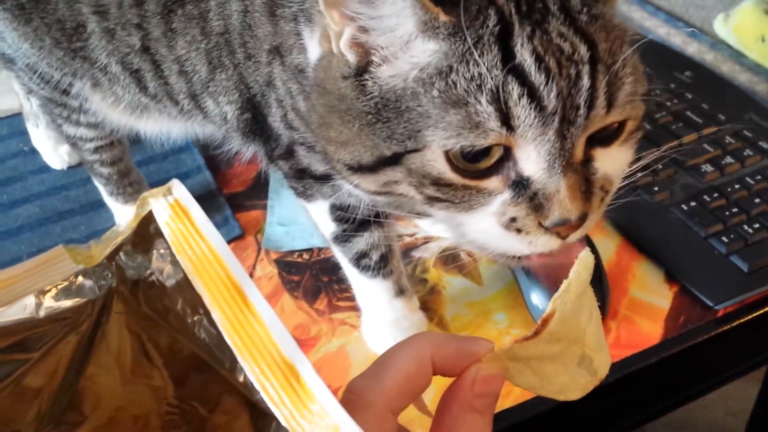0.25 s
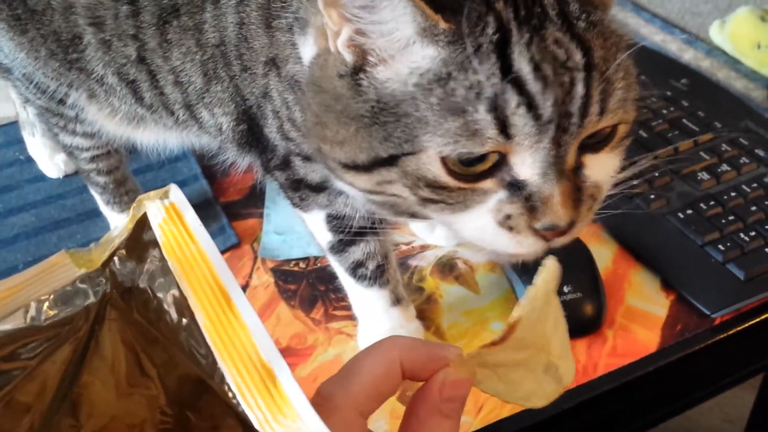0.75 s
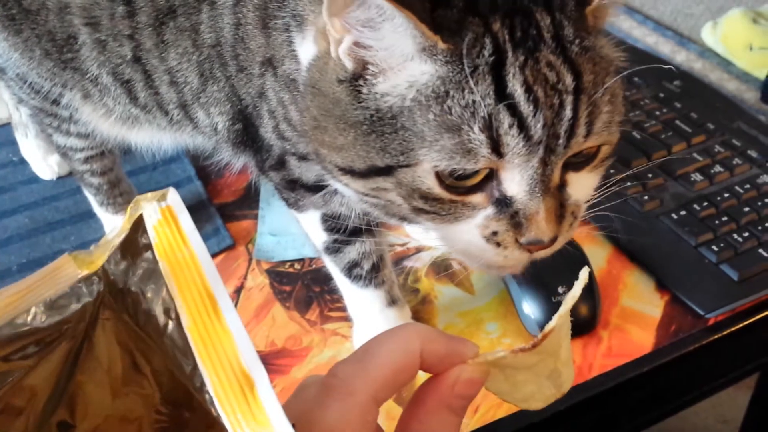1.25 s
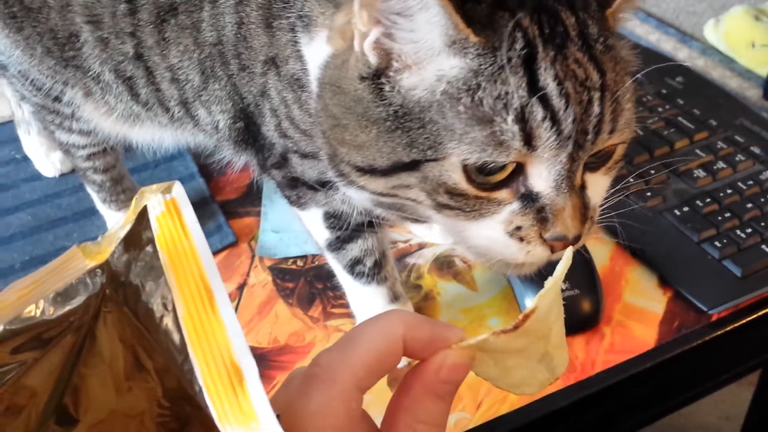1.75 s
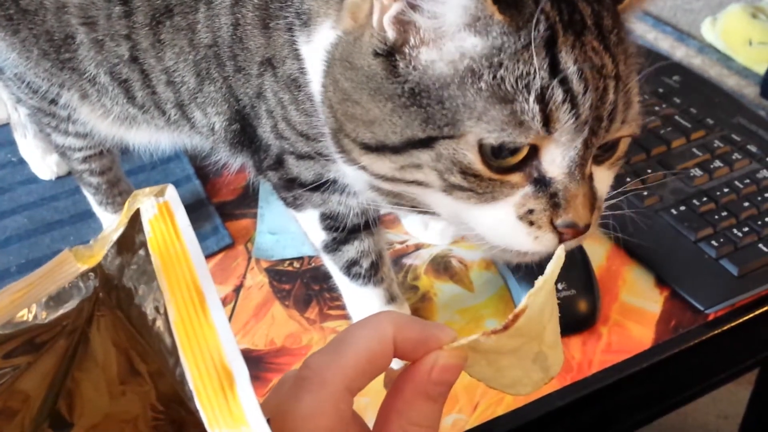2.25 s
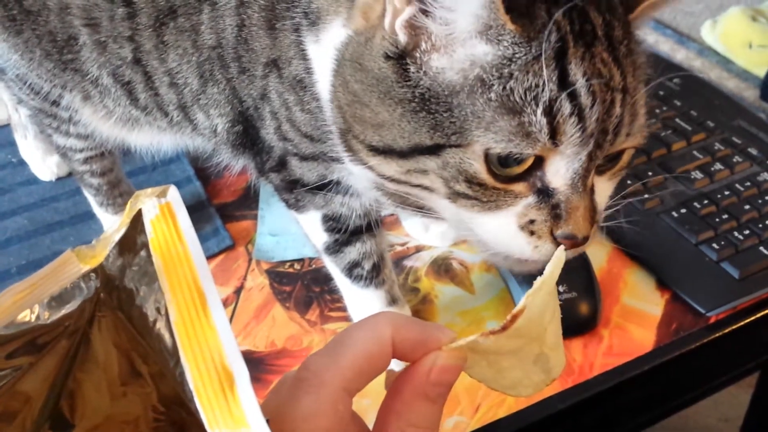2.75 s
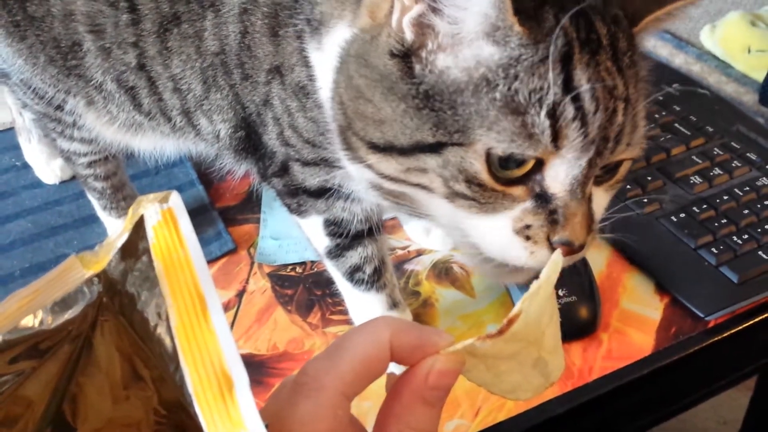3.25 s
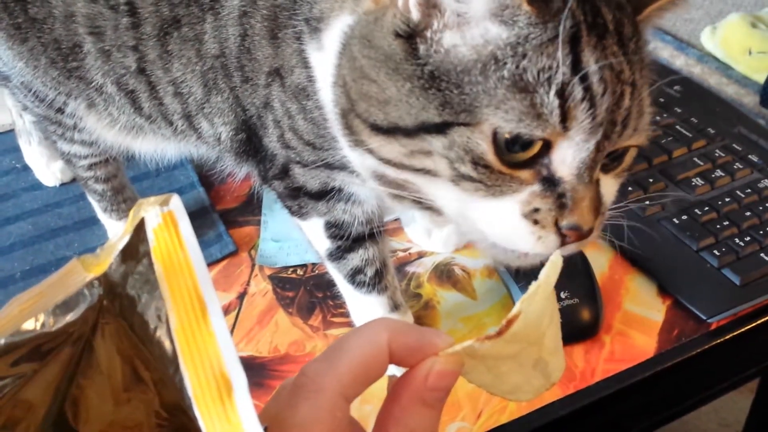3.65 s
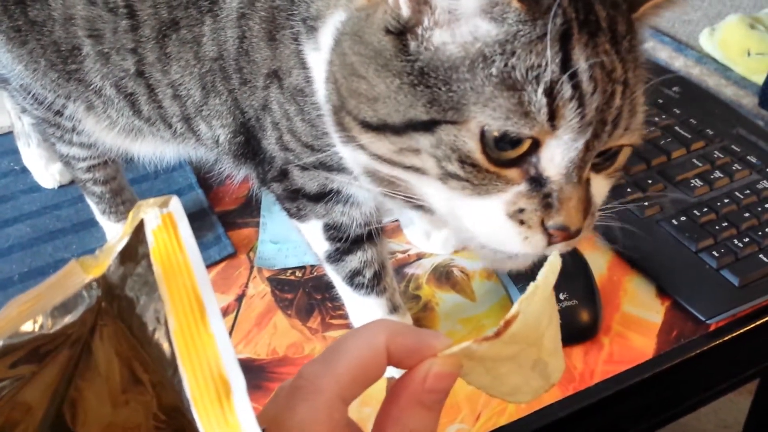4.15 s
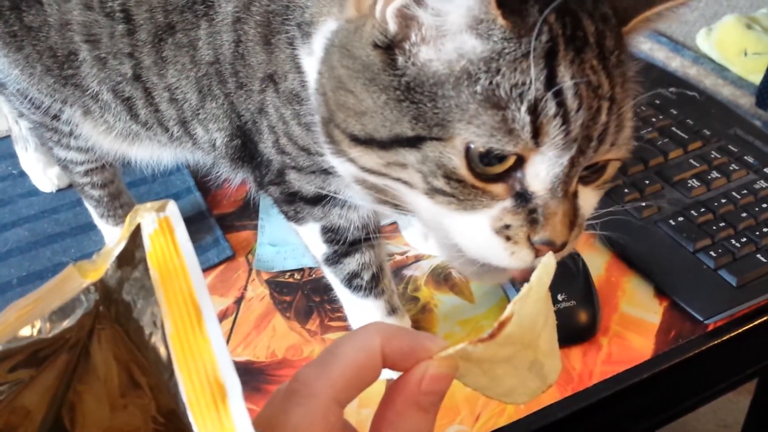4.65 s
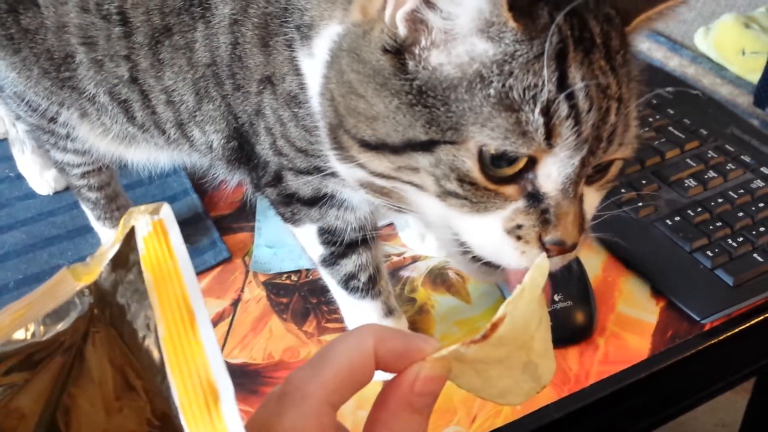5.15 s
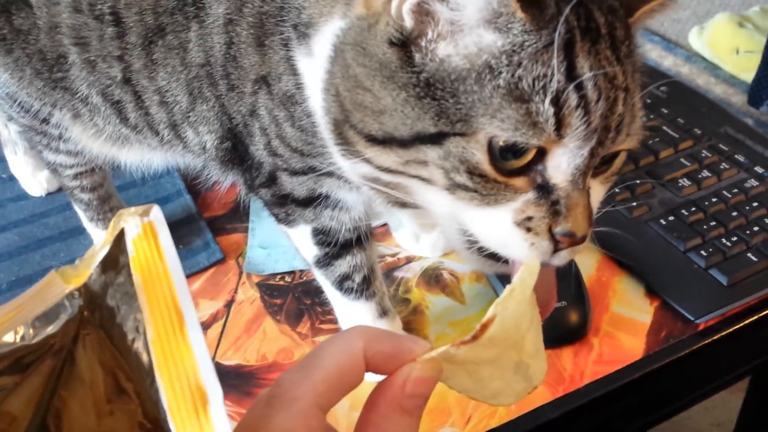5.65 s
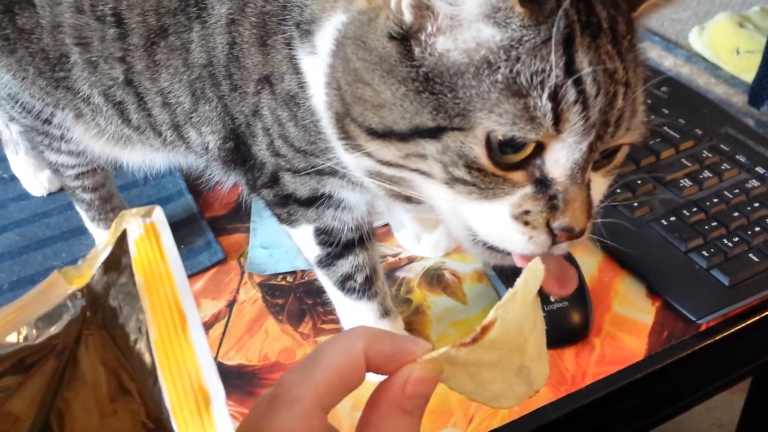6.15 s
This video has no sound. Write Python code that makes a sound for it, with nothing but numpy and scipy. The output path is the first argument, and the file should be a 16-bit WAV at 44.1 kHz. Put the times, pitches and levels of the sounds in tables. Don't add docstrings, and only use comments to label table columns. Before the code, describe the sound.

Close up in a small furnished room, a cat licks a crisp held in a hand. Tiny bright clicks and a brief foil bag rustle come first, then stronger crackles and one loud sharp crack near two seconds. Afterwards faint raspy licks, wet mouth pops and sparse ticks continue. Low computer fans hum steadily beneath, with slight hiss, in close stereo.

```python
import sys
import numpy as np
from scipy import signal
from scipy.fft import rfft, irfft
from scipy.io import wavfile

SR = 44100
rng = np.random.default_rng(int(sys.argv[2]) if len(sys.argv) > 2 else 0)


def persist_wave(psi):
    counts = np.round(np.clip(psi, -1, 1) * 32767).astype(np.int16)
    wavfile.write(sys.argv[1], SR, np.atleast_2d(counts).T)


def voltage_ratio(level):
    return 10 ** (np.asarray(level, float) / 20)


N = 282504
CRACK_S = 1.9436


def rms_one(x):
    return x / np.sqrt(np.mean(x ** 2) + 1e-20)


def in_time(rows):
    return np.interp(np.arange(N) / SR, *np.transpose(rows))


def at_hz(points, hz):
    table_hz, value = np.transpose(points)
    return np.interp(np.log(hz + 1e-9), np.log(table_hz), value)


def drift(rate_hz):
    knots = rng.standard_normal(400)
    return np.interp(np.arange(N) / SR * rate_hz, np.arange(400), knots)


def colour(x, points):
    cepstrum = irfft(np.log(voltage_ratio(at_hz(points, np.fft.rfftfreq(4096, 1 / SR)))))
    cepstrum[1:2048] *= 2
    response = irfft(np.exp(rfft(cepstrum[:2049], 4096)))[:2048]
    return signal.fftconvolve(x, response)[:len(x)]


def resonance(x, hz, width_hz):
    r = np.exp(-np.pi * width_hz / SR)
    zeros = [(1 - r * r) / 2, 0, (r * r - 1) / 2]
    poles = [1, -2 * r * np.cos(2 * np.pi * hz / SR), r * r]
    return signal.lfilter(zeros, poles, x)


def ping(hz, width_hz):
    impulse = np.eye(1, 1024)[0]
    pulse = resonance(resonance(impulse, hz, width_hz), hz, width_hz * 1.2)
    return pulse / np.abs(pulse).max()


def grains(per_s, spread_db):
    sizes_db = spread_db * np.minimum(rng.exponential(1, (2, N)), 4)
    sizes = voltage_ratio(sizes_db) * rng.choice([-1, 1], (2, N))
    return rms_one(sizes * (rng.random((2, N)) < per_s / SR))


def crumble(length_ms, draw):
    t_ms = np.arange(400) / SR * 1000
    sparse = draw ** 3 * np.exp(-(t_ms / length_ms) ** 2)
    run = voltage_ratio(-20.5) * (sparse[0] + 1.12 * sparse[1:])
    run[:, 0] = 1
    return run


def crumbling_ms(db, share):
    shortest_ms, ms_per_db, faint_db = 1.55, 0.1, -52
    return share * (shortest_ms + ms_per_db * max(db - faint_db, 0))


def clicks(table, gain_db, edge_db, lag_s):
    out, edge = np.zeros((2, N + 1500)), ping(5000, 14000)
    draws = rng.standard_normal((len(table), 3, 400))
    for (s, peak_db, hz, cycles, pan_db, length_ms), draw in zip(table, draws):
        ring = ping(hz, hz / np.clip(cycles, .5, 12)) + voltage_ratio(edge_db) * edge
        left, right = (np.convolve(run, ring) for run in crumble(length_ms, draw))
        start = int((s + lag_s) * SR)
        left_gain = voltage_ratio(peak_db + gain_db + pan_db / 2) / np.abs(left).max()
        right_gain = voltage_ratio(peak_db + gain_db - pan_db / 2) / np.abs(right).max()
        out[0, start + 5:start + 5 + len(left)] += left_gain * left
        out[1, start:start + len(right)] += right_gain * right
    return out[:, :N]


def tongue():
    # middle in seconds, length in seconds, level in dB.
    strokes = [(0.145, 0.043, -70), (1.684, 0.052, -65), (2.192, 0.065, -63), (2.636, 0.042, -71.5),
               (3.072, 0.079, -64.5), (3.585, 0.073, -66), (4.015, 0.055, -69.5), (4.472, 0.03, -66),
               (4.933, 0.033, -67), (5.228, .03, -67), (5.361, 0.045, -64), (5.83, 0.07, -64),
               (6.25, 0.043, -67)]
    t = np.arange(N) / SR
    swell = sum(voltage_ratio(db) * np.exp(-((t - s) / (length_s / 2)) ** 2) for s, length_s, db in strokes)
    rasp = [resonance(g, 6200, 3500) + voltage_ratio(-9) * resonance(g, 2300, 1200) for g in grains(6000, 3.0)]
    unevenness = voltage_ratio(3.0 * drift(50))
    return swell * unevenness * rms_one(np.array(rasp)) * voltage_ratio([[0], [-4]])


def crack():
    # pitch in Hz, width in Hz, peak in dB.
    left_modes = [(1760, 1040, -19), (5660, 910, -8), (10100, 1600, -16), (13300, 2500, -19),
                  (4350, 360, -30), (7400, 880, -25), (3300, 1150, -30.5)]
    right_modes = [(2160, 1300, -24.5), (5050, 1300, -17.5), (8950, 1600, -13), (7330, 780, -33),
                   (12800, 2900, -11), (3600, 4900, -36.5)]
    # delay in seconds, level in dB, left pitch in Hz, right pitch in Hz.
    bounce = (.0022, -24, 5450, 5300)
    delay_s, bounce_db, *bounce_hz = bounce
    out = np.zeros((2, N))
    splinters = crumble(2.1, rng.standard_normal((3, 400)))
    for side, modes in enumerate([left_modes, right_modes]):
        start = int(CRACK_S * SR) + 6 * (1 - side)
        out[side, start:start + 1024] += sum(voltage_ratio(db) * ping(hz, width_hz) for hz, width_hz, db in modes)
        out[side, start:start + 400] += voltage_ratio(-20.5) * resonance(splinters[side], 6800, 11000)
        start += int(delay_s * SR)
        out[side, start:start + 1024] += voltage_ratio(bounce_db) * ping(bounce_hz[side], 500)
    return out


def snaps():
    # start in seconds, peak in dB, pitch in Hz, left over right in dB.
    crumb_rows = [(0.1246, -50.5, 6740, -10), (0.3093, -48.5, 6420, 6), (0.4853, -49, 5330, 9),
                  (0.601, -45, 5700, 14), (0.6614, -48, 8940, -2), (0.7128, -46, 5900, 12),
                  (0.8836, -48, 5420, 10), (0.9093, -35, 5750, 19), (0.9817, -41, 5240, 14),
                  (1.3186, -38, 7900, 7), (1.3773, -43.5, 6900, -6), (1.444, -38.5, 7500, 3),
                  (1.5058, -44, 5530, 1), (1.5198, -31.5, 5300, 15), (1.5404, -24, 5740, 6.5),
                  (1.5585, -33, 5130, 16), (1.669, -48, 5700, 10.5), (1.6963, -52, 5200, 6),
                  (3.025, -32.5, 4960, 0), (3.314, -46, 5730, 11), (3.5964, -45, 5370, 9),
                  (4.4704, -36, 5600, 15.5), (5.0983, -47, 5150, -1), (5.5402, -47, 6850, 13),
                  (5.5664, -45.5, 5860, 12), (5.7443, -40, 5200, 5), (6.0035, -45, 5900, 9.5),
                  (6.042, -51, 6350, 12), (6.3225, -43, 9040, 4)]
    # start in seconds, peak in dB.
    tick_rows = [(0.5028, -59), (3.1744, -55), (3.7994, -54), (3.8194, -56), (4.0987, -50), (4.2044, -54),
                 (4.655, -53), (4.8994, -54), (5.1194, -49), (5.1514, -60), (5.3294, -55), (5.5194, -53),
                 (5.6144, -55), (5.8094, -64), (6.1212, -48)]
    tick_hz, tick_spread, tick_cycles, tick_pan_db, tick_ms = 6600, .07, 2.5, 0, 1.55
    crumbs = [(s, db, hz, 2.1 + 0.12 * max(pan_db, 0), pan_db, crumbling_ms(db, 0.73))
              for s, db, hz, pan_db in crumb_rows]
    ticks = [(s, db, tick_hz * (1 + tick_spread * chance), tick_cycles, tick_pan_db, tick_ms)
             for (s, db), chance in zip(tick_rows, rng.standard_normal(len(tick_rows)))]
    return clicks(crumbs + ticks, gain_db=-1.5, edge_db=6, lag_s=.0003)


def body():
    # start in seconds, peak in dB, pitch in Hz.
    ring_rows = [(0.485, -52, 2890), (0.503, -48.5, 3600), (0.9827, -50.5, 2030), (1.6973, -49, 2930),
                 (2.388, -53, 3140), (2.86, -61.5, 2000), (3.049, -53, 2320), (3.2565, -64, 2190),
                 (3.3136, -60, 2030), (3.5997, -57, 1990), (3.594, -63, 1290), (3.601, -54, 3200),
                 (3.605, -58, 2200), (3.766, -52, 2840), (4.142, -55.5, 3530), (4.2044, -55, 4000),
                 (4.6546, -61, 2950), (5.0976, -50.5, 2800), (5.1114, -58, 2240), (5.227, -56, 2760),
                 (5.233, -61, 2130), (5.3544, -57, 3260), (5.7465, -55, 2140), (6.0011, -50.5, 2810),
                 (6.3225, -58, 2560)]
    # start in seconds, peak in dB, pitch in Hz, cycles of ring.
    chime_rows = [
        (0.9088, -41, 1900, 1.7),
        (0.9105, -38, 3060, 2.2),
        (1.5183, -29.5, 2700, 2.3),
        (1.5399, -30.5, 2620, 1.9),
        (1.5588, -43, 2130, 2.5),
        (3.026, -43.5, 2640, 3.7),
        (4.47, -40, 2670, 4.1),
        (4.4688, -39, 4350, 5.5),
    ]
    # start in seconds, peak in dB, pitch in Hz, lower modes in dB,
    # crumbling in ms.
    pop_rows = [(0.9093, -36, 1250, -11.5, 1.7), (0.983, -51.5, 1100, 0, 1.7), (1.08, -55, 1300, -1.5, 1.6),
                (1.519, -36, 1340, -10, 1.1), (1.5413, -39.5, 1650, -6.5, 1.2),
                (1.559, -45.5, 1600, -4, 1.2), (1.644, -57, 1300, -5, 3.1), (3.025, -41, 1250, -10.5, 1.5),
                (3.599, -49, 1560, -3.5, 1.2), (4.4703, -43, 1350, -8.5, 0.34), (5.227, -57, 1030, -6, 1.2)]
    # share of the body's pitch, cycles of ring, level in dB.
    lower_modes = [(0.52, 1.5, -0.5), (0.26, 3.7, -3)]
    rings = [(s, db, hz, 4, 4, crumbling_ms(db, 0.7)) for s, db, hz in ring_rows]
    rings += [(s, db, hz, cycles, 2.2, crumbling_ms(db, 1.0)) for s, db, hz, cycles in chime_rows]
    pops = [(s, db, hz, 2.8, 4.5, ms) for s, db, hz, _, ms in pop_rows]
    thuds = [(s, db + low_db + mode_db, hz * share, cycles, 1.5, 1.14 * ms)
             for s, db, hz, low_db, ms in pop_rows for share, cycles, mode_db in lower_modes]
    return (clicks(pops, gain_db=0.5, edge_db=-26, lag_s=0.00068)
            + clicks(rings, gain_db=1.5, edge_db=-2.5, lag_s=0.00031)
            + clicks(thuds, gain_db=5.5, edge_db=-30, lag_s=0.001026))


def smacks():
    # start in seconds, peak in dB, pitch in Hz, cycles of ring.
    smack_rows = [
        (1.847, -45.5, 890, 8.2),
        (1.8625, -54, 1750, 13),
        (1.863, -51, 2700, 3.0),
        (1.8635, -47.5, 1040, 4.5),
        (1.6, -48, 1080, 5),
        (2.746, -55, 1600, 4.3),
        (2.746, -53, 930, 2.9),
        (3.885, -33, 2430, 2.4),
        (3.1, -50, 3300, 3.7),
        (3.8865, -50, 3300, 7.5),
    ]
    pan_db, length_ms = 1.5, .2
    pops = [(s, db, hz, cycles, pan_db, length_ms) for s, db, hz, cycles in smack_rows]
    return clicks(pops, gain_db=0, edge_db=-40, lag_s=0)


def foil():
    # time in seconds, level in dB.
    pressure = [
        (.5, -80),
        (.7, -66.5),
        (.76, -63.5),
        (.8, -72),
        (.9, -59.5),
        (1.17, -61.5),
        (1.33, -69.5),
        (1.52, -70),
        (1.65, -80),
    ]
    t = np.arange(N) / SR
    touched = (t > pressure[0][0]) & (t < pressure[-1][0])
    left, right = grains(7000, 2.8)
    left = (resonance(left, 5500, 1600) + voltage_ratio(-11) * resonance(left, 12000, 8000)
            + voltage_ratio(-10.5) * resonance(left, 1900, 2500))
    right = (voltage_ratio(-13.0) * resonance(right, 6700, 5000) + voltage_ratio(-8) * resonance(right, 12200, 6000)
             + voltage_ratio(-7.5) * resonance(right, 1500, 2600))
    return touched * voltage_ratio(in_time(pressure)) * rms_one(np.array([left, right]))


def jolts():
    # start in seconds, level in dB, pitch in Hz.
    knocks = [
        (0.909, -44.5, 105),
        (0.929, -56, 187),
        (1.519, -48, 192),
        (1.562, -41.5, 182),
        (1.946, -41.5, 400),
        (1.961, -51, 183),
        (3.598, -46, 107),
    ]
    out, t = np.zeros(N + 4096), np.arange(4096) / SR
    for s, db, hz in knocks:
        start = int(s * SR)
        out[start:start + 4096] += voltage_ratio(db) * np.sin(2 * np.pi * hz * t) * np.exp(-t * hz / 2.55)
    return out[:N]


def fans():
    # pitch in Hz, rms level in dB.
    motor_lines = [(113, -67.5), (121, -64), (167, -78), (252, -67.5), (770, -79.5)]
    # frequency in Hz, density in dB per Hz.
    air_colour = [(22, -55), (45, -19.5), (80, -10), (120, -8.5), (165, -3), (195, -6.5), (280, 2.5),
                  (340, -10.5), (480, -16), (800, -19), (1150, -20), (1400, -26.5), (2000, -29.5),
                  (4000, -34), (16000, -30)]
    # time in seconds, level in dB.
    air_level = [(0.0, -57), (0.4, -58), (1.1, -55.5), (2.16, -56.5), (2.46, -58.5), (3.6, -56.5),
                 (3.94, -58), (6.41, -56.5)]
    # frequency in Hz, correlation.
    likeness = [(60, .76), (130, .93), (290, .96), (640, .5), (1410, .17), (3100, 0)]
    hz = np.fft.rfftfreq(N, 1 / SR)
    alike = at_hz(likeness, hz)
    mid, side = rfft(rng.standard_normal((2, N)))
    pair = np.sqrt(1 + alike) * mid + np.sqrt(1 - alike) * side * [[1], [-1]]
    noise = rms_one(irfft(voltage_ratio(at_hz(air_colour, hz)) * pair, N))
    out = voltage_ratio(in_time(air_level) + 2.0) * noise
    for line_hz, db in motor_lines:
        phase = 2 * np.pi * np.cumsum(line_hz * (1 + 0.0036 * drift(2.994))) / SR
        out = out + voltage_ratio(db + 1 + 0.29 * drift(3.4)) * np.sin(phase + 6 * rng.random())
    return out


def room(x):
    # delay in seconds, spread in seconds, dB over the tail.
    echoes = [(.0088, .0012, 7), (.0112, .0008, 6), (.024, .003, 2)]
    # frequency in Hz, T60 in seconds.
    decay = [(300, 0.38), (1500, 0.31), (5500, 0.33), (9000, 0.067), (14000, 0.2)]
    t = np.arange(SR // 2) / SR
    white = rng.standard_normal((2, len(t)))
    tail = 0
    for low_hz in 250 * 2 ** np.arange(0, 6, .5):
        sos = signal.butter(1, [low_hz, low_hz * np.sqrt(2)], "band", fs=SR, output="sos")
        tail = tail + signal.sosfilt(sos, white) * voltage_ratio(-60 * t / at_hz(decay, low_hz * 1.2))
    swells_db = sum(db * np.exp(-((t - delay_s) / spread_s) ** 2) for delay_s, spread_s, db in echoes)
    tail = tail * np.clip((t - .002) / 0.0079, 0, 1) * voltage_ratio(swells_db)
    tail = voltage_ratio(-16) * tail / np.sqrt(np.sum(tail ** 2, axis=1, keepdims=True))
    return signal.fftconvolve(x, tail, axes=1)[:, :N]


def scene():
    dull, bright, wet, loud = body(), snaps(), smacks(), crack()
    outward = voltage_ratio(-4.0) * loud + voltage_ratio(-1.5) * dull + voltage_ratio(-1.5) * bright + voltage_ratio(-19) * wet
    start = int(CRACK_S * SR)
    outward[:, start] += voltage_ratio(2.5)
    outward[:, start + 1] -= voltage_ratio(-14)
    near = loud + dull + bright + wet
    return near + room(outward) + tongue() + foil() + jolts() + fans()


def band_limit(x):
    return signal.sosfilt(signal.butter(12, 16850, fs=SR, output="sos"), x)


def record(dry):
    # frequency in Hz, gain in dB.
    left_port = [(300, 0), (1200, 1.5), (1750, 8.5), (2500, 6.5), (3800, 4), (4700, 4.5), (5600, 6.5),
                 (6600, 5.5), (8500, -12.5), (11000, -10.5), (16000, -7.5)]
    right_port = [(300, 0.5), (1200, 2.5), (2300, 2), (4300, 5.5), (5150, 7.5), (5700, 3), (6900, 9.5),
                  (8500, 7.5), (10500, 2), (13500, -6), (16000, 7)]
    ports = np.array([colour(dry[0], left_port), colour(dry[1], right_port)])
    hissing = ports + voltage_ratio(-66.5) * rng.standard_normal((2, N))
    top_cut = signal.cheby2(10, 50, 16150, fs=SR, output="sos")
    return band_limit(signal.sosfilt(top_cut, hissing))


dry = scene()
out = record(dry)
persist_wave(out)
```